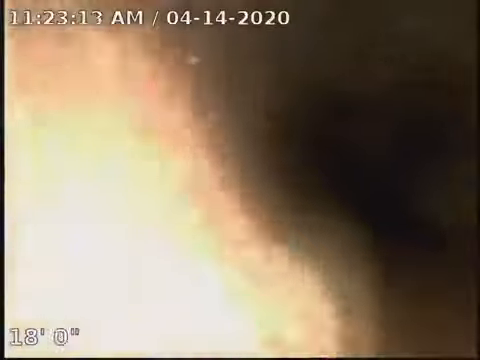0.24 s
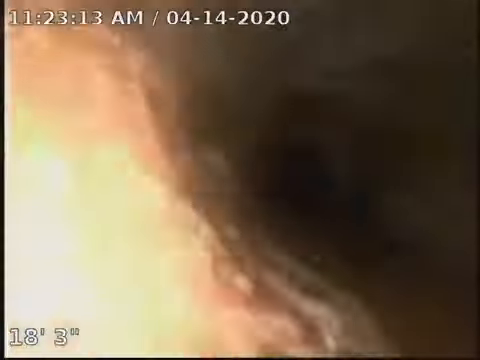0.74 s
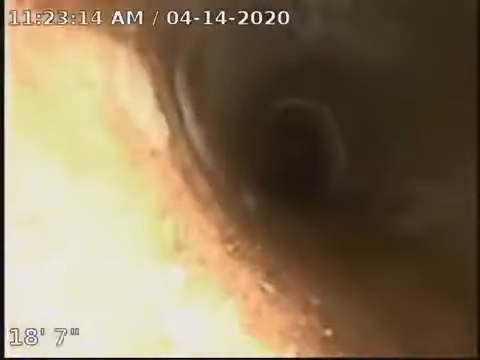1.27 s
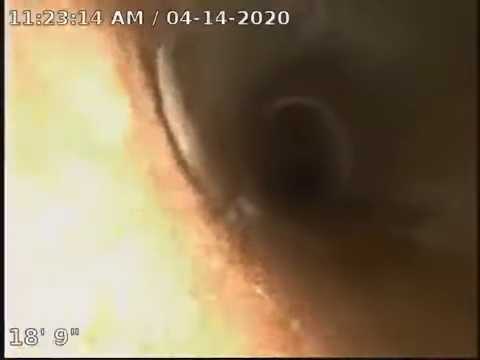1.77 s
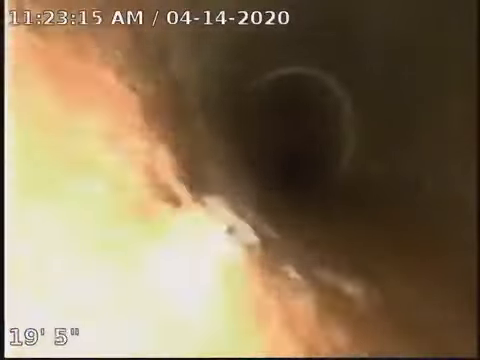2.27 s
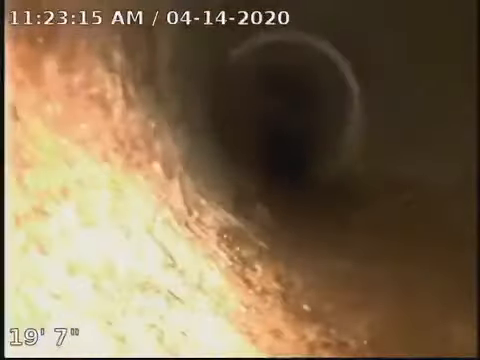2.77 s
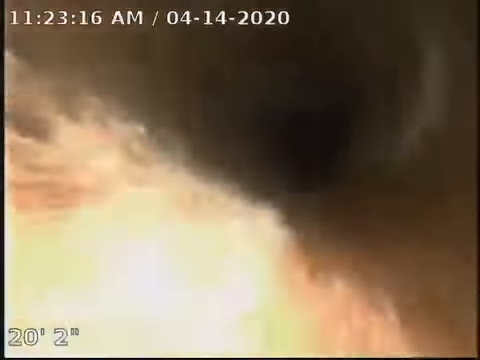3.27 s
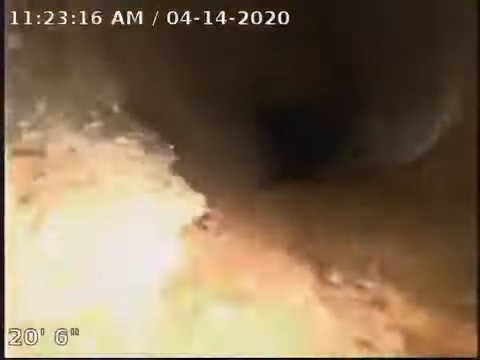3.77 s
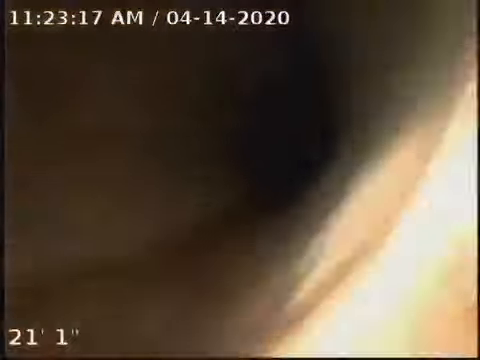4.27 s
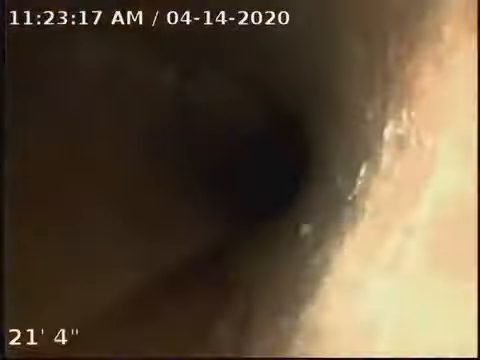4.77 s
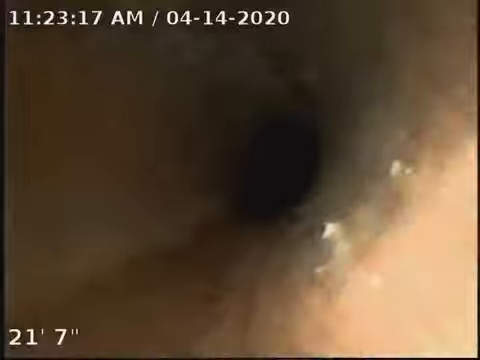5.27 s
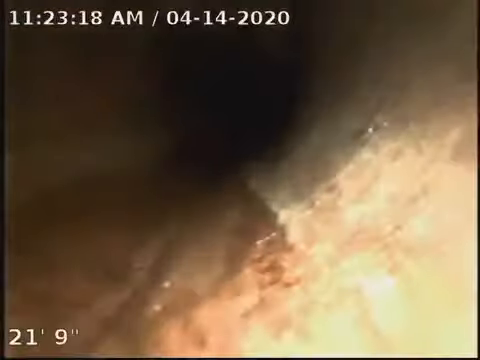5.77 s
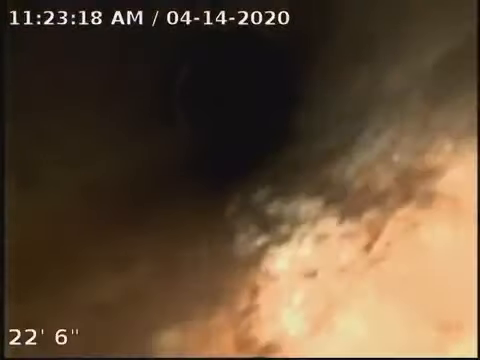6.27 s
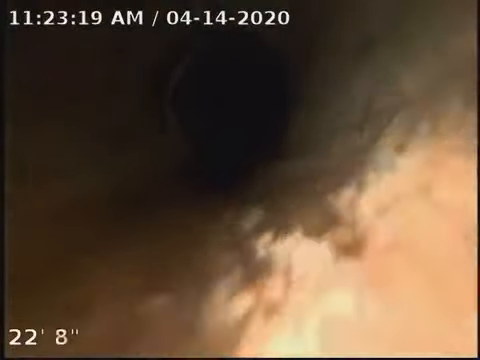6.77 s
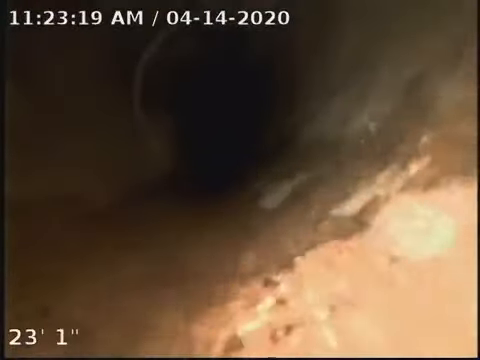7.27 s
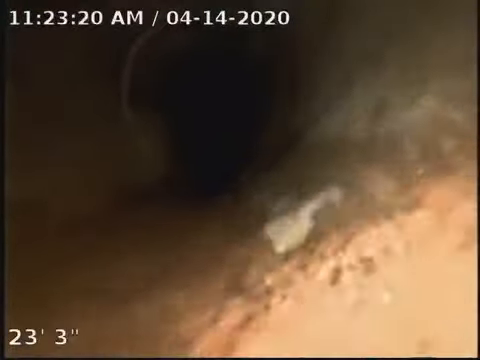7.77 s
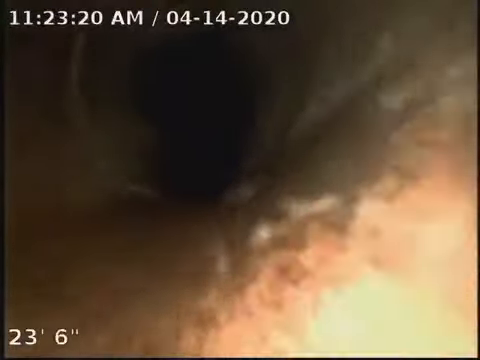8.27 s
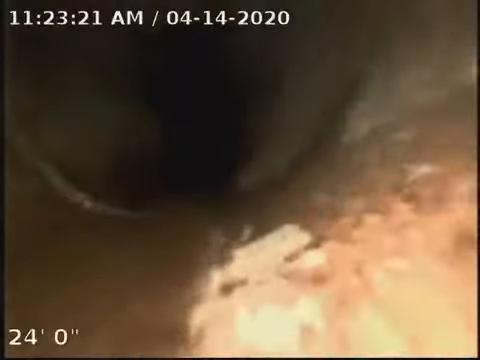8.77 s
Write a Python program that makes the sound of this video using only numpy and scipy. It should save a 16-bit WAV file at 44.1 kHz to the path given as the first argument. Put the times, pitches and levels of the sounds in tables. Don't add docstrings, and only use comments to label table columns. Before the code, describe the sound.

Low steady hum and soft ambient noise lie under stop-and-go rubbing of a rod against its guides, with hollow drumming, gritty rasp and thin hiss. Small grit ticks appear now and then. Sharp knocks punctuate it, loudest near four seconds, with another clear one at seven and a half. Heard close by the reel, with muffled treble.

```python
import sys
import numpy as np
from scipy import signal
from scipy.fft import rfft, irfft, next_fast_len
from scipy.io import wavfile
from scipy.ndimage import uniform_filter1d, map_coordinates

SR = 44100
rng = np.random.default_rng(int(sys.argv[2]) if len(sys.argv) > 2 else 0)


def wav_record(signal):
    frames = np.transpose(np.atleast_2d(signal))
    bounded = np.clip(frames, -1, 1)
    quanta = np.round(bounded * 32767).astype(np.int16)
    wavfile.write(sys.argv[1], SR, quanta)


def ratio_of_db(decibels):
    return 10 ** (np.asarray(decibels, float) / 20)


N = 398223
COARSE = 64

# (frequency [Hz], density [dB per Hz])
AIR_SPECTRUM = [(150, -30), (250, -3), (359, -7.5), (698, -16), (948, -11), (1870, -18.5), (2920, -20),
                (4880, -26), (6350, -26), (6900, -27), (8970, -59), (15200, -120)]

# (shaft multiple, level against the main line [dB])
SHAFT_LINES = [(1, -22.5), (2, 1.5), (4, -19), (5, -13), (6, -16.5)]
# (time [s], hum level [dB], throb level [dB])
MOTOR_LEVELS = [(0.0, -57, -42), (0.16, -38.5, -43), (0.42, -44, -54), (1.72, -42.5, -45.5),
                (2.19, -48, -49), (2.6, -42, -49), (2.92, -44.5, -55), (3.3, -42.5, -49),
                (3.75, -45, -47.5), (4.5, -41.5, -45), (5.07, -47, -44), (5.56, -44.5, -44),
                (6.78, -44, -49.5), (7.48, -42, -44.5), (7.75, -45, -35), (8.81, -42.5, -41),
                (9.03, -47, -45)]
# (frequency [Hz], density [dB per Hz])
THROB_SPECTRUM = [(8, -44.5), (15, -22.5), (26, -7), (33, -1.5), (40, -2.5), (54, -5), (75, -29.5),
                  (200, -120)]
RUMBLE_SPECTRUM = [(20, -48), (48, -14), (65, 4), (85, -6), (120, -7.5), (145, -18), (200, -17), (400, -50),
                   (800, -120)]
SHAFT_HZ = 31.13
RUMBLE_DB, RUMBLE_SWAY_DB = -43.5, 1.9

# (time [s], peak level [dB], centre frequency [Hz])
GRIT_TICKS = [
    (.098, -33, 5940),
    (.266, -38, 1500),
    (1.572, -39, 3830),
    (2.239, -37, 5100),
    (4.831, -36, 3400),
    (5.104, -30, 1500),
    (7.3, -36.5, 700),
    (7.672, -35, 4000),
    (8.754, -36, 3000),
]

# (frequency [Hz], width [Hz], level [dB])
CAGE_MODES = [(963.6, 74, -4.5), (2836, 110, 0), (6720, 1300, 3), (445.4, 49, -1)]
# (level at a -50 dB shove [dB], growth with strength, growth with brightness)
CAGE_RUB = [
    (-59.5, 1.1, -0.2),
    (-67.5, .8, .1),
    (-71.5, 0.42, 0.74),
    (-58, 1.4, -.5),
]
# (peak time [s], rise [s], fall [s], level [dB])
CAGE_SPELLS = [
    [(.06, .04, 0.064, -40.5), (.28, .04, .15, -40.5), (.82, .25, 0.18, -42), (4.26, .05, 0.039, -43.5),
     (6.03, .3, 0.037, -49), (6.24, .04, 0.061, -54)],
    [(.27, .05, .1, -52.5), (1.27, .1, 0.057, -52.5), (3.1, .9, 0.39, -60.5), (3.57, .08, .04, -53),
     (3.87, .12, .08, -55), (4.0, .04, .03, -54.5), (4.26, .05, .04, -51), (8.33, .07, .05, -55)],
    [(.28, .1, 0.046, -61), (.82, .15, 0.14, -65), (2.05, .2, 0.59, -59.5), (3.0, .3, 0.26, -58.5),
     (5.05, .15, 0.072, -61), (7.3, .04, .04, -65)],
    [(1.33, 0.031, 0.063, -42), (2.26, .06, .08, -54), (3.27, .04, 0.067, -43.5), (5.0, 0.048, 0.037, -44),
     (6.23, 0.036, 0.036, -44), (6.7, 0.055, 0.11, -45.5), (8.33, .04, 0.06, -43.5)],
]

# (time [s], peak level [dB], thud level [dB], snap level [dB], contact length [ms])
KNOCKS = [(0.042, -41.5, 0, -19, 6.4), (0.062, -20.5, -14, -26, 5.8), (0.299, -28, -15, -22, 5.7),
          (0.752, -34.5, -24, -31, 6), (1.252, -20, -6.5, -26, 10.6), (3.612, -14, -9, -11, 5),
          (3.615, -14, -14, -17, 5.2), (3.621, -5.5, -12, -27, 6.6), (4.026, -2.5, -13.5, -15.5, 4.74),
          (4.255, -29, -6, -19.5, 9), (4.278, -22.5, -21, -33, 5.7), (4.2804, -15.5, -17, -36, 5.1),
          (5.441, -34, -30, -30, 3.9), (5.57, -30, -6.5, -18, 2.6), (6.236, -34.5, -5, -30, 10),
          (7.072, -36.5, -4, -23, 10), (7.506, -26, -6.5, -21, 16), (7.52, -14.5, -10, -17, 8.3)]
# (frequency [Hz], width [Hz], level [dB])
THUD_MODES = [(100, 58, -6), (195.4, 12.4, 0.5), (247.4, 24, 2), (332.5, 32, -2), (458, 59, 0)]
CLACK_MODES = [(620, 110, -2.5), (834, 117, 5), (950, 218, 6), (1266, 240, 3.5), (1705, 580, -1),
               (2130, 1020, -5.5)]
SNAP_MODES = [(2730, 550, 1), (4000, 1050, -1), (5500, 1900, -6.5)]
ROD_M = 1.078

# (peak time [s], rise [s], fall [s], strength [dB], brightness [dB])
SHOVES = [(.04, 0.071, 0.14, -47, 1.5), (.3, .1, 0.12, -45, -1.5), (.64, 0.13, 0.18, -49.5, -0.5),
          (.97, 0.26, 0.15, -52, 1), (1.27, 0.086, 0.091, -44.5, -3), (1.57, .11, 0.15, -46, 0.5),
          (1.8, 0.075, 0.1, -45, -0.5), (1.95, 0.17, 0.13, -48.5, -1), (2.24, 0.3, 0.085, -55.5, 0.5),
          (2.52, 0.083, 0.045, -51, -3.5), (2.72, 0.078, 0.083, -48, 0.5), (3.08, 0.33, 0.43, -52.5, 6),
          (3.26, 0.21, 0.035, -48.5, 3), (3.6, .12, 0.031, -40.5, 0), (3.9, 0.17, 0.062, -49.5, 4),
          (4.45, 0.72, 0.25, -57.5, 2), (5.02, 0.13, 0.13, -46.5, 0.5), (5.22, 0.25, 0.38, -51, -2),
          (5.45, 0.41, 0.3, -52.5, 1.5), (5.75, 0.3, 0.17, -48, 3), (6.68, 0.12, 0.069, -44.5, -1),
          (6.92, 0.51, 0.17, -52, 0.5), (7.76, 0.22, .1, -53, 5), (7.95, 0.28, 0.2, -52.5, 6.5)]
# (time [s], strength [dB], brightness [dB])
JOLTS = [(2.31, -53, 0), (3.75, -52.5, 1), (4.01, -48.5, -0.5), (4.266, -47, -2.5), (4.72, -64, -2),
         (5.576, -49, -5), (5.84, -50, -7), (6.028, -46, -2.5), (6.232, -48.5, -3), (6.45, -53.5, 2),
         (7.078, -50, 0), (7.301, -46.5, -2), (7.5, -49.5, -1.5), (8.323, -46.5, -2.5), (8.542, -49, -2.5),
         (8.72, -54.5, 1), (8.94, -61, -11), (2.1, -58, 3), (2.4, -58.5, 3), (2.9, -50, -3), (7.19, -73, 5),
         (8.17, -57, 4)]
# (time [s], half length [s], depth [dB])
STALLS = [(.19, 0.027, 6), (1.406, 0.043, 8), (1.705, .03, 2), (2.62, .025, 12), (3.356, 0.035, 0.5),
          (3.69, .03, -1.5), (4.61, 0.045, 5.5), (6.14, 0.043, 9), (7.114, .03, 10), (7.225, 0.034, 7),
          (8.2, .03, 0), (8.476, .02, 5)]
# (peak time [s], rise [s], fall [s], level [dB])
GRITTY_SPELLS = [
    (5.75, 0.087, .07, -52),
    (7.96, 0.17, .08, -51.5),
    (1.82, .08, .1, -52.5),
]
JOLT_RISE_S, JOLT_FALL_S = 0.062, 0.05
ROUNDNESS = 1.27
FADE_DB, REST_DB = 11, -63
# (level at a -50 dB shove [dB], growth with strength, growth with brightness)
DRUM_RUB = (-45.5, 0.68, -.7)
SCRAPE_RUB = (-50, 1, -0.12)
RASP_RUB = (-54.5, 0.95, 0.97)
HISS_RUB = (-58.5, 0.8, .8)
# (frequency [Hz], width [Hz], level [dB])
DRUM_MODES = [(181.6, 52, 3), (285.3, 81.6, 0), (438, 36.7, -4.5)]
# (frequency [Hz], density [dB per Hz])
SCRAPE_SPECTRUM = [(300, -43.5), (520, 3), (700, -1), (950, 2), (1250, 0), (1550, -3), (1900, -20),
                   (2600, -26), (5000, -120)]
RASP_SPECTRUM = [(900, -43.5), (1500, -12.5), (1900, -1.5), (2500, -3.5), (3300, -5), (3900, -8.5),
                 (5000, -39), (9000, -120)]
HISS_SPECTRUM = [(2500, -40.5), (3700, -11), (4330, -0.5), (4900, -5), (5400, -1), (6300, -4.5),
                 (6900, -7.5), (9000, -40.5), (15000, -120)]
# (frequency [Hz], width [Hz], level [dB])
RASP_GUIDE = (2875, 44, 4.4)
HISS_GUIDE = (4330, 76, 1.3)


def unit(x):
    return x / np.sqrt(np.mean(x ** 2) + 1e-20)


def peak_unit(x):
    return x / np.abs(x).max()


def along(points, hz):
    f, v = np.transpose(points)
    return np.interp(np.log(hz + 1), np.log(f + 1), v)


def curves(rows):
    s, *columns = np.transpose(rows)
    return [np.interp(np.arange(N) / SR, s, column) for column in columns]


def wobble(rate):
    knots = rng.standard_normal(int(N * rate / SR) + 4)
    return map_coordinates(knots, [np.arange(N) * rate / SR])


def filtered(x, response):
    m = next_fast_len(len(x) + 8192)
    return irfft(rfft(x, m) * response(np.fft.rfftfreq(m, 1 / SR)), m)[:len(x)]


def shaped(noise, spectrum):
    return unit(filtered(noise, lambda f: ratio_of_db(along(spectrum, f))))


def modes(rows):
    return lambda f: sum((-1) ** k * ratio_of_db(db) * 1j * f * w / (c * c - f * f + 1j * f * w)
                         for k, (c, w, db) in enumerate(rows))


def grit(grain_db, patchy_db):
    grains = rng.standard_normal(N) * ratio_of_db(grain_db * wobble(180))
    z = signal.stft(grains, nperseg=512)[2]
    field = uniform_filter1d(rng.standard_normal(z.shape), 6, 0)
    field = uniform_filter1d(field, 10, 1)
    return signal.istft(z * ratio_of_db(patchy_db * unit(field)), nperseg=512)[1][:N]


def swells(rows):
    s, rise, fall, db = np.transpose(rows)[:4, :, None]
    late = np.arange(0, N, COARSE) / SR - s
    distance = np.where(late < 0, -late / np.abs(rise), late / np.abs(fall))
    return ratio_of_db(db - FADE_DB * distance ** ROUNDNESS) ** 2


def stretched(x):
    return np.interp(np.arange(N) / COARSE, np.arange(len(x)), x)


def rub_db(layer):
    jolts = [(s, JOLT_RISE_S, JOLT_FALL_S, db, bright) for s, db, bright in JOLTS]
    rows = np.array(list(SHOVES) + jolts)
    power = swells(rows)
    total = power.sum(0) + ratio_of_db(REST_DB) ** 2
    share = power / total
    t = np.arange(len(total)) * COARSE / SR
    stall_db = sum(db * np.exp(-((t - s) / half) ** 2) for s, half, db in STALLS)
    strength_db = 10 * np.log10(total * ratio_of_db(-2 * stall_db))
    brightness_db = rows[:, -1] @ share
    level, grows, tilts = layer
    return stretched(level + grows * (strength_db + 50) + tilts * brightness_db)


def air():
    return ratio_of_db(-54.5) * shaped(rng.standard_normal(N), AIR_SPECTRUM)


def motor():
    line_db, throb_db = curves(MOTOR_LEVELS)
    turn = 2 * np.pi * np.cumsum(SHAFT_HZ + 0.097 * wobble(1.6)) / SR
    lines = sum(ratio_of_db(db + 0.59 * wobble(2.6)) * np.sin(k * turn + rng.uniform(0, 7.72))
                for k, db in SHAFT_LINES)
    throb = shaped(rng.standard_normal(N), THROB_SPECTRUM)
    rumble = shaped(rng.standard_normal(N), RUMBLE_SPECTRUM)
    rumble_db = RUMBLE_DB + RUMBLE_SWAY_DB * wobble(2.6)
    return ratio_of_db(line_db + 4.5) * lines + ratio_of_db(throb_db + 2.0) * throb + ratio_of_db(rumble_db) * rumble


def ticks():
    out, t = np.zeros(N + SR), np.arange(SR // 20) / SR
    for s, db, hz in GRIT_TICKS:
        burst = rng.standard_normal(len(t)) * np.exp(-t / 0.0024)
        tick = filtered(burst, modes([(hz, 0.78 * hz, 0)]))
        out[round(s * SR):][:len(t)] += ratio_of_db(db + 2.5) * peak_unit(tick)
    return out[:N]


def cage():
    out = np.zeros(N)
    for layer, spells, mode in zip(CAGE_RUB, CAGE_SPELLS, CAGE_MODES):
        drive = np.sqrt(ratio_of_db(rub_db(layer)) ** 2 + stretched(swells(spells).sum(0)))
        ring = filtered(grit(grain_db=0, patchy_db=4.0), lambda f: modes([mode])(f) ** 2.1)
        beads = ratio_of_db(3.3 * wobble(40))
        out += ratio_of_db(mode[2]) * drive * unit(beads * ring)
    return out


def bending(f):
    return np.exp(-2j * np.pi * 0.0324 * ROD_M * (2 * np.sqrt(f) - f / np.sqrt(6000)))


def knocks():
    out, t = np.zeros(N + SR), np.arange(SR // 3) / SR
    blow = 2.5 * np.exp(-((t - .0008) / 0.000065) ** 2)
    rattle = ratio_of_db(-60 * t / 0.14)
    for s, db, thud_db, snap_db, contact_ms in KNOCKS:
        noise = rng.standard_normal((3, len(t)))
        decay = np.exp(-1000 * t / max(contact_ms, .3)) * (1 - np.exp(-t / 0.00043))
        clack_force = noise[0] * (decay + 0.071 * rattle) - blow
        snap_force = noise[1] * (decay ** 2.0 + 0.14 * decay ** 0.39 + 0.016 * rattle) - 1.24 * blow
        thud_force = noise[2] * decay ** 0.3 - 5 * blow
        clack = peak_unit(filtered(clack_force, modes(CLACK_MODES)))
        snap = peak_unit(filtered(snap_force, modes(SNAP_MODES)))
        thud = peak_unit(filtered(thud_force, lambda f: modes(THUD_MODES)(f) / (1 + (f / 600) ** 4)))
        hit = clack + ratio_of_db(thud_db + 7.5) * thud + ratio_of_db(snap_db + 12.5) * snap
        out[round((s - .0007) * SR):][:len(t)] += ratio_of_db(db) * filtered(hit, bending)
    return out[:N]


def sliding():
    drum_db, scrape_db, rasp_db, hiss_db = map(rub_db, (DRUM_RUB, SCRAPE_RUB, RASP_RUB, HISS_RUB))
    rasp_db = 10 * np.log10(ratio_of_db(rasp_db) ** 2 + stretched(swells(GRITTY_SPELLS).sum(0)))

    drum = unit(filtered(grit(grain_db=3.0, patchy_db=0.67), lambda f: modes(DRUM_MODES)(f) * (f > 140)))
    contact = grit(grain_db=1.5, patchy_db=2.0)
    scrape = shaped(contact, SCRAPE_SPECTRUM)
    rasp = shaped(contact, RASP_SPECTRUM)
    rasp = unit(rasp + filtered(rasp, modes([RASP_GUIDE])))
    hiss = shaped(grit(grain_db=2.0, patchy_db=0.0), HISS_SPECTRUM)
    hiss = unit(hiss + filtered(hiss, modes([HISS_GUIDE])))

    surge = wobble(25)
    return (ratio_of_db(drum_db + 1.4 * wobble(14) + 1.5 * surge) * drum
            + ratio_of_db(scrape_db + 1.0 * wobble(14) + 1.2 * surge) * scrape
            + ratio_of_db(rasp_db + 0.53 * wobble(14) + 0.85 * surge) * rasp
            + ratio_of_db(hiss_db + 1.04 * wobble(14) + 0.89 * surge) * hiss)


def scene():
    return (air() + motor() + ticks() + cage() + knocks() + sliding())[None]


def narrow_band(x):
    hz, t, z = signal.stft(x, SR, nperseg=1024)
    step = np.repeat(rng.standard_normal(len(t) // 8 + 1), 8)[:len(t)]
    below_edge = hz[:, None] < 6823 + 55 * step
    chance = unit(uniform_filter1d(rng.standard_normal(z.shape), size=16, axis=1))
    weak = np.exp(-((hz - 4850) / 200) ** 2) + 0.9 * np.exp(-((hz - 3950) / 150) ** 2) + .4 * (hz > 5600)
    spared = (chance < 2.9 - 2.1 * weak[:, None]) | (np.abs(z) > ratio_of_db(-72))
    return signal.istft(z * (below_edge * spared), SR, nperseg=1024)[1][:N]


def band_limit(x):
    return signal.sosfilt(signal.butter(12, 7860, fs=SR, output="sos"), x)


def record(dry):
    floor = ratio_of_db(-97) * rng.standard_normal((1, N))
    mix = narrow_band(dry[0])[None] + floor
    return band_limit(mix)


dry = scene()
out = record(dry)
wav_record(out)
```